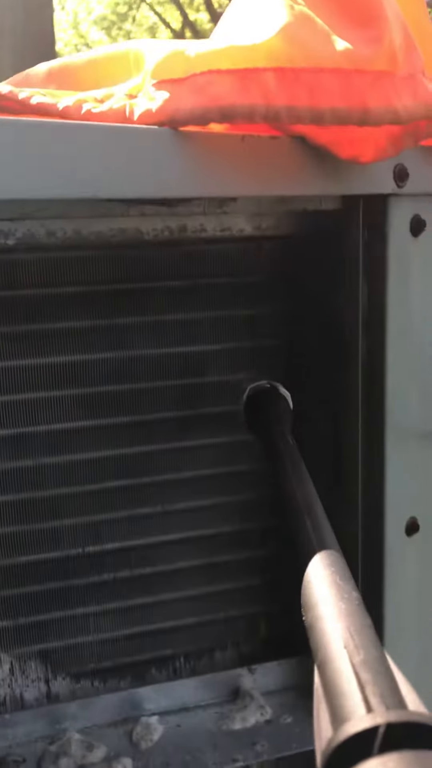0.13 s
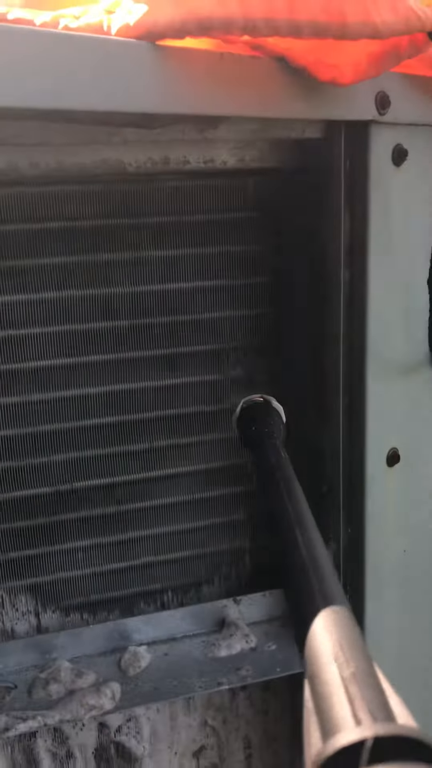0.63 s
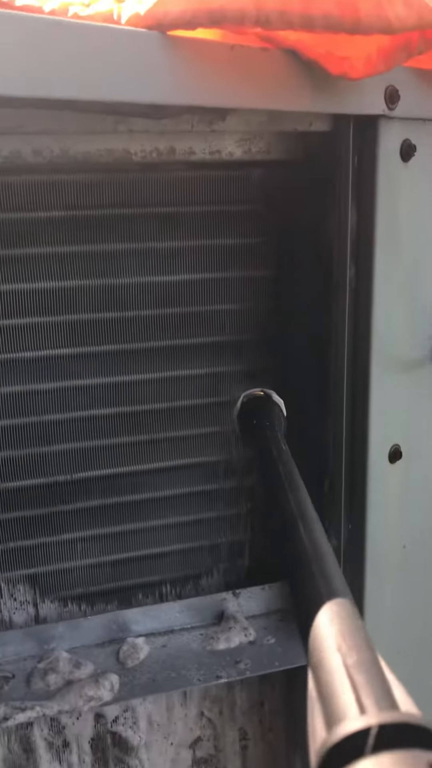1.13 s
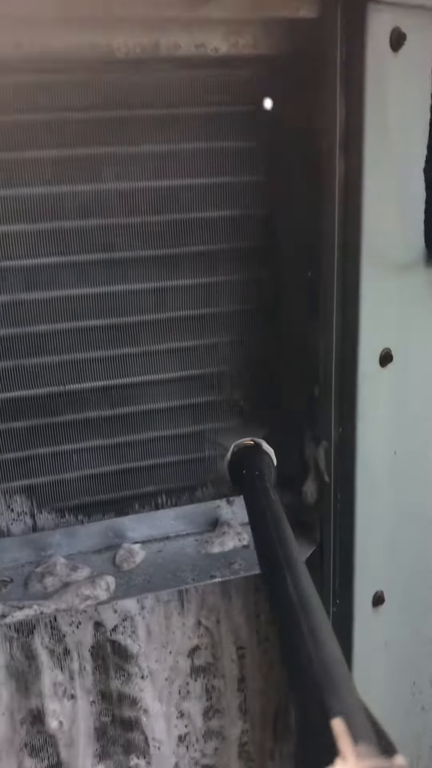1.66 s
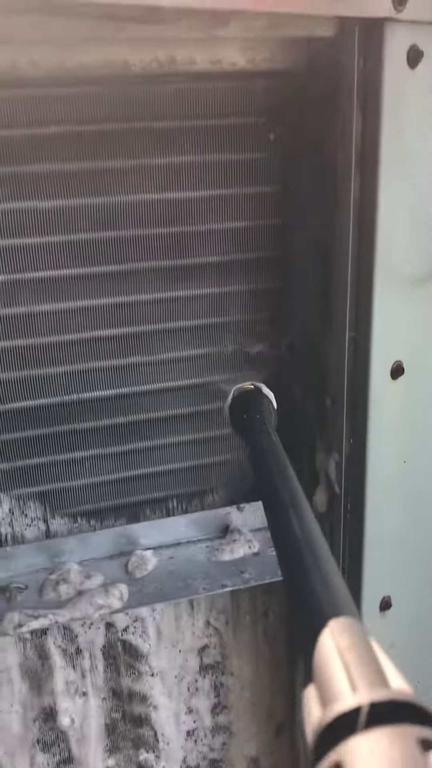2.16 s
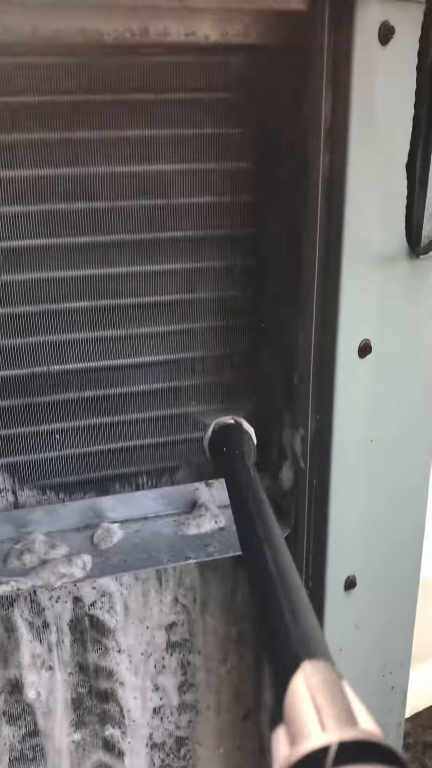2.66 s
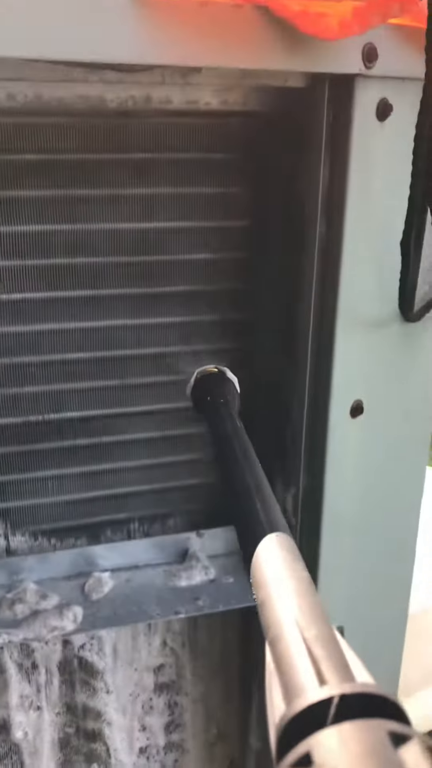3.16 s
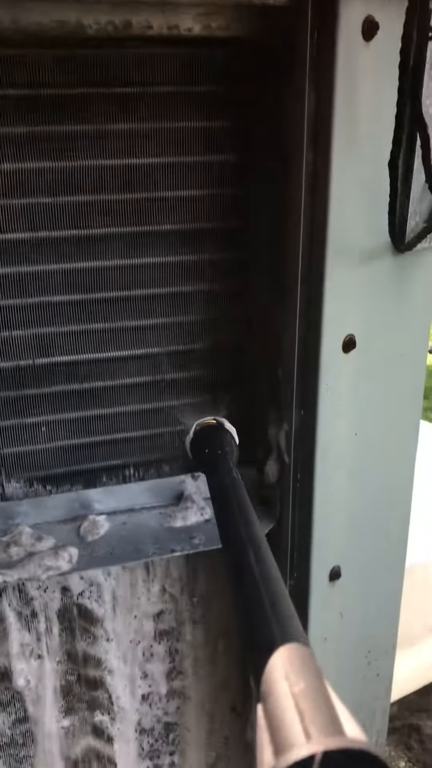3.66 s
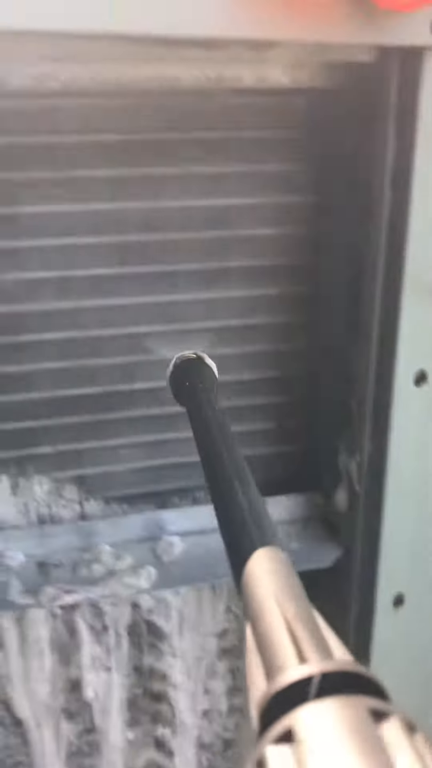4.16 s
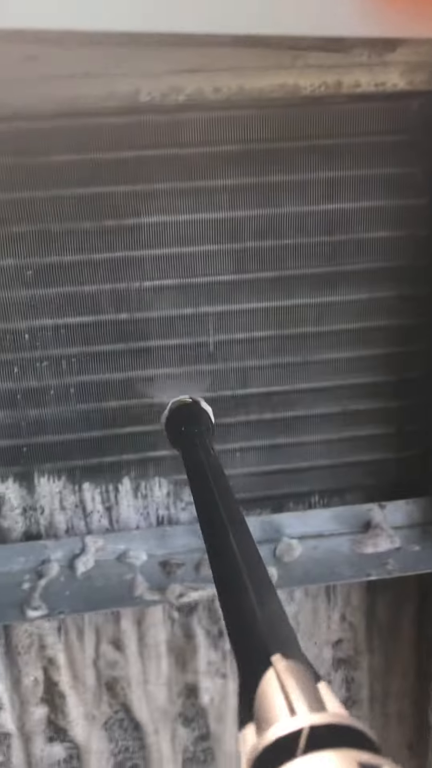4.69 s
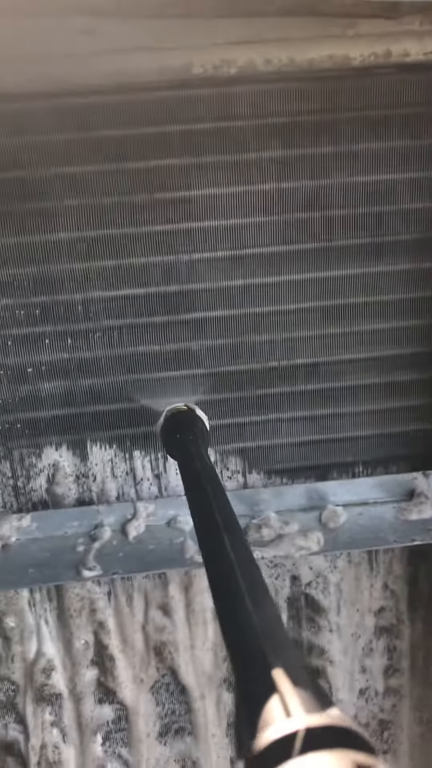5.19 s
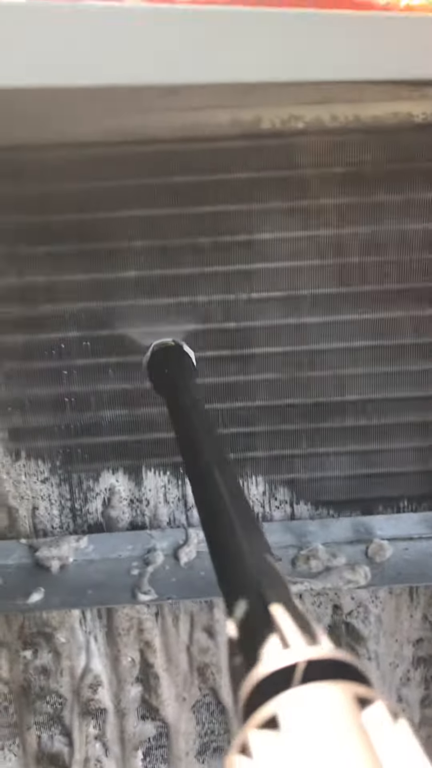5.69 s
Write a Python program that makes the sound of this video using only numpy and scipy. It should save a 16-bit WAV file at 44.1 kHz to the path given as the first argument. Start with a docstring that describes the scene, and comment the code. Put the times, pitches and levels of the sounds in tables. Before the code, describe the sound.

Close, bright water spray sweeps over a finned cooling coil in quick bursts above a buzzing motor and pump, later smoothing into steadier hiss.

```python
"""A small electric pressure washer sprays a finned coil at arm's length from a single microphone.
From the start a motor (sines at shaft multiples) whines through a gear pair into a three-piston pump
(sines at pump multiples); its jet (filtered drop noise) hisses, flares across tubes and rings fin gaps.
Big drops (decaying noise bursts) smack now and then over rumble (noise) and a faint hum (sines) that
sinks; past the last flares a low drone (sines) comes and goes and a thin whistle swells and fades."""
import sys
import numpy as np
from scipy import signal
from scipy.fft import rfft, irfft, next_fast_len
from scipy.io import wavfile
from scipy.ndimage import uniform_filter1d, map_coordinates

SR = 44100
rng = np.random.default_rng(int(sys.argv[2]) if len(sys.argv) > 2 else 0)


def makeup_ratio(level_db):
    """Linear amplitude ratio for a level in decibels (20 dB per factor of ten)."""
    decades = np.asarray(level_db, float) / 20
    return 10 ** decades


def dump(signal):
    """Clip the signal to [-1, 1] and save it as 16-bit WAV at the path in sys.argv[1]."""
    limited = np.clip(np.atleast_2d(signal).T, -1, 1)
    pcm = np.round(limited * 32767).astype(np.int16)
    wavfile.write(sys.argv[1], SR, pcm)


N = 256662
TIME_S = np.arange(N) / SR

SHAFT_HZ = 155.8
PUMP_HZ = SHAFT_HZ * 11 / 50  # pinion teeth over wheel teeth

# Spectrum of the spray. Each row: frequency in Hz, relative density in dB per Hz.
SPRAY_SPECTRUM = [(1500, -43), (3000, -8), (4200, 0.5), (6000, 0.5), (7500, -0.5), (8700, 2), (10000, 0.1),
                  (10500, -2), (11500, -1.5), (14000, -2.5), (15800, -5.5)]
# Machine levels. Each row: time in s, fourth shaft order in dB, housing roar in dB,
# twentieth pump order in dB, thin whistle in dB.
MACHINE_LEVELS = [(0, -38, -32, -50, -56), (1.3, -38, -33, -53, -54), (1.6, -35.5, -30, -50, -53),
                  (2.7, -36, -32, -46, -56), (4.4, -37.5, -33, -44.5, -54.5), (4.7, -38, -33, -45, -46.5),
                  (5.4, -39.5, -34.5, -46.5, -43), (5.82, -41, -33, -48, -60)]


def unit(x):
    """Scaled to rms 1."""
    return x / np.sqrt(np.mean(x ** 2) + 1e-20)


def along(points, hz):
    """(Hz, value) points interpolated on a log frequency axis."""
    point_hz, value = np.transpose(points)
    return np.interp(np.log(hz + 1), np.log(point_hz + 1), value)


def curves(rows):
    """One value per sample for each column after the time."""
    s, *columns = np.transpose(rows)
    return [np.interp(TIME_S, s, column) for column in columns]


def wobble(knots_per_s):
    """Smooth random curve through normally distributed knots."""
    knots = rng.standard_normal(int(N * knots_per_s / SR) + 4)
    return map_coordinates(knots, [TIME_S * knots_per_s])


def hump(t, middle_s, length_s, square):
    """Rises, holds and falls around its middle, height 1; higher square = flatter top, steeper sides."""
    return np.exp(-np.abs(2 * (t - middle_s) / length_s) ** square)


def coloured(x, spectrum):
    """x through a spectrum, rms 1."""
    m = next_fast_len(N + 8192)
    gain = makeup_ratio(along(spectrum, np.fft.rfftfreq(m, 1 / SR)))
    return unit(irfft(rfft(x, m) * gain, m)[:N])


def band(centre_hz, width_hz):
    """Noise in one resonance, rms 1."""
    peak = [(centre_hz - width_hz, -30), (centre_hz, 0), (centre_hz + width_hz, -30)]
    return coloured(rng.standard_normal(N), peak)


def orders(hz, table, waver_db, slip_rad):
    """Sines at multiples of a turning speed, each wavering in level and phase."""
    turns = np.cumsum(hz) / SR
    out = np.zeros(N)
    for multiple, db in table:
        phase = 2 * np.pi * (multiple * turns + rng.random()) + slip_rad * wobble(12)
        level_db = db + waver_db * (wobble(2.99) + wobble(25))
        out += makeup_ratio(level_db) * np.sqrt(2) * np.sin(phase)
    return out


def droplets(grains_per_s, spread_db):
    """Drop impacts: noise whose strength varies smoothly at random from grain to grain."""
    return unit(makeup_ratio(spread_db * wobble(grains_per_s)) * rng.standard_normal(N))


def jet_level_db():
    """Steady hiss plus a flare each time the jet crosses a tube."""
    # Hiss between flares. Each row: time in s, level in dB.
    steady = [(0.0, -28.5), (1.3, -28), (1.45, -25.5), (2.0, -26), (2.15, -29.5), (2.55, -28.5),
              (2.65, -23.5), (3.35, -29), (3.8, -25.5), (4.22, -29.5), (4.3, -25.5), (4.56, -28),
              (4.85, -29.5), (4.97, -26.5), (5.22, -27.5), (5.3, -30), (5.82, -28.5)]
    # Tube crossings. Each row: middle in s, length in s, lift in dB.
    flares = [(0, 0.045, 4.5), (0.082, 0.068, 6.5), (0.207, 0.078, 6.5), (0.354, 0.13, 11),
              (0.521, 0.11, 9.5), (0.657, 0.14, 8), (0.783, 0.097, 7.5), (0.948, 0.13, 8),
              (1.076, 0.079, 9), (1.18, 0.077, 8), (1.308, 0.08, 6), (1.75, 0.046, 2.5), (2.1, 0.051, 6.5),
              (2.211, 0.093, 6.5), (2.315, 0.05, 6), (2.384, 0.054, 7.5), (2.458, 0.073, 7.5),
              (2.804, 0.043, 4.5), (2.879, 0.058, 4.5), (3.108, 0.11, 4.5), (3.276, 0.109, 8),
              (3.414, 0.077, 7.5), (3.514, 0.073, 6.5), (3.635, 0.087, 5), (3.91, 0.041, 4),
              (3.995, 0.054, 5), (4.073, 0.06, 3.8)]
    lift_db = sum(db * hump(TIME_S, s, length_s, 4.1) for s, length_s, db in flares)
    return curves(steady)[0] + lift_db


def fin_gap_ringing_db(hz, t):
    """Lift over frequency and time where the jet rings the fin gaps, each ring climbing in pitch."""
    # Rings. Each row: middle in s, length in s, mid pitch in Hz, nominal lift in dB.
    rings = [(0.076, 0.06, 10300, 8), (0.098, 0.064, 4910, 9.5), (0.31, 0.035, 8700, 8),
             (0.225, 0.04, 4300, 8), (0.347, 0.054, 4570, 12), (0.348, 0.032, 9550, 8),
             (0.392, 0.083, 15000, 15), (0.534, 0.12, 5870, 15.5), (0.662, 0.068, 5840, 14),
             (0.93, 0.09, 5770, 14), (0.991, 0.016, 5400, 15), (1.058, 0.03, 15500, 11),
             (1.072, 0.05, 8500, 9), (1.085, 0.05, 5100, 11), (1.1, 0.097, 11100, 12),
             (1.185, 0.035, 7300, 9), (1.186, 0.043, 5830, 16), (1.33, 0.022, 8700, 9),
             (1.734, 0.03, 8000, 10), (1.807, 0.06, 7240, 13), (2.003, 0.1, 6300, 11),
             (2.104, 0.046, 7100, 15), (2.2, 0.055, 4500, 7), (2.19, 0.025, 11500, 9),
             (2.24, 0.04, 8800, 9), (2.298, 0.06, 6740, 11), (2.383, 0.016, 9900, 11),
             (2.452, 0.15, 15500, 11), (2.463, 0.052, 5000, 15), (2.8, 0.032, 7350, 12),
             (2.81, 0.04, 4700, 6), (2.832, 0.018, 7900, 14), (2.866, 0.015, 7600, 20),
             (2.885, 0.045, 5150, 5), (2.91, 0.026, 8600, 20), (3.055, 0.12, 4600, 10),
             (3.11, 0.22, 9000, 10), (3.242, 0.05, 8550, 18), (3.286, 0.076, 4920, 11),
             (3.3, 0.056, 8730, 15), (3.414, 0.042, 4930, 12), (3.42, 0.04, 8170, 9),
             (3.493, 0.045, 7000, 9), (3.537, 0.045, 9350, 11), (3.56, 0.32, 14500, 8),
             (3.645, 0.025, 8300, 10), (3.648, 0.085, 5660, 16), (3.77, 0.041, 8400, 8),
             (3.92, 0.05, 4360, 12), (3.91, 0.04, 6600, 11), (4.0, 0.06, 13100, 10),
             (4.015, 0.03, 7200, 15), (4.063, 0.035, 7100, 13), (4.098, 0.024, 7800, 18),
             (4.37, 0.37, 8760, 6.5), (4.4, 0.28, 9840, 6), (5.08, 0.3, 14200, 6), (5.1, 0.32, 8650, 6),
             (5.2, 0.9, 4320, 5)]
    width_hz, width_share = 230, 0.036  # half width, plus share of pitch
    rise_share, sputter_share = 0.035, 0.2  # pitch climb over one length; random share of lift
    lift_db = np.zeros((len(hz), len(t)))
    for s, length_s, pitch_hz, db in rings:
        climbing_hz = pitch_hz * (1 + rise_share * (t - s) / length_s)
        offset = (hz - climbing_hz) / (width_hz + width_share * pitch_hz)
        lift_db += db * np.exp(-offset ** 2) * hump(t, s, length_s, 2.7)
    return lift_db * (1 + sputter_share * np.interp(t, TIME_S, wobble(60)))


def jet():
    """Drop noise, lifted where fin gaps ring and throbbing at the three-piston rate."""
    # Sweep over the fins. Each row: time in s, treble tilt in dB (reached at 16 kHz),
    # random ringing in dB rms before flare scaling.
    sweep = [(0, 1, 2.5), (.5, 4.5, 2), (2, 1, 2.5), (3.1, 2.5, 2), (4.3, 3, 2.1), (4.8, 1.5, 0.5),
             (5.82, -1, 2)]
    drops = coloured(droplets(700, spread_db=1.0), SPRAY_SPECTRUM)
    hz, t, z = signal.stft(drops, SR, nperseg=256)
    hz = hz[:, None]
    bright_db, patchy_db = (np.interp(t, TIME_S, curve) for curve in curves(sweep))
    hiss_db = jet_level_db()
    flare_db = hiss_db - uniform_filter1d(hiss_db, size=SR // 3)
    flare_db = np.interp(t, TIME_S, flare_db)

    # a flare is brighter and rings more
    lift_db = fin_gap_ringing_db(hz, t)
    lift_db += (bright_db + 0.31 * flare_db) * (hz - 8000) / 8000
    # many smaller gaps ring at random
    patches = uniform_filter1d(rng.standard_normal(z.shape), size=3, axis=0)
    patches = uniform_filter1d(patches, size=8, axis=1)
    lift_db += patchy_db * makeup_ratio(0.35 * flare_db) * unit(patches)

    # ringing shares the jet's power
    weight = makeup_ratio(2 * along(SPRAY_SPECTRUM, hz))
    share = np.sqrt((weight * makeup_ratio(2 * lift_db)).sum(0) / weight.sum())
    spray = unit(signal.istft(z * makeup_ratio(lift_db) / share, SR, nperseg=256)[1][:N])
    throb = 1 + 0.07 * np.sin(2 * np.pi * 3 * PUMP_HZ * TIME_S)
    return makeup_ratio(hiss_db + 1.0 * wobble(40)) * throb * spray


def hiss_bands():
    """Two noise resonances that swell and sink."""
    # Each row: time in s, 2.4 kHz band in dB, 3.5 kHz band in dB.
    swells = [(0, -37, -63), (1.3, -38.5, -47), (1.7, -56, -36.5), (2.6, -45, -41), (3.2, -43, -42),
              (4.5, -48, -38), (4.8, -37.5, -39.5), (5.3, -36, -41.5), (5.6, -38.5, -38.5),
              (5.82, -40, -44)]
    low_db, high_db = curves(swells)
    return makeup_ratio(low_db) * band(2430, 1300) + makeup_ratio(high_db) * band(3570, 2000)


def motor_whine():
    """Sines at multiples of the shaft speed."""
    # Each row: multiple of shaft speed, level in dB.
    shaft_orders = [(1, -51.5), (5, -53.5), (7, -52.5), (8, -43), (11, -48.5), (12, -37), (22, -46),
                    (44, -53.5)]
    fourth_db, _, _, whistle_db = curves(MACHINE_LEVELS)
    shaft_hz = np.full(N, SHAFT_HZ)
    whine = orders(shaft_hz, shaft_orders, waver_db=0.6, slip_rad=0.22)
    whine += makeup_ratio(fourth_db) * orders(shaft_hz, [(4, 0)], waver_db=0.0, slip_rad=0.26)
    # swells with the whistle
    whine += makeup_ratio(whistle_db) * orders(shaft_hz, [(16, 1)], waver_db=2.0, slip_rad=0.71)
    return whine


def pump_lines():
    """Sines at multiples of the geared-down pump speed, the highest a thin whistle."""
    # Each row: multiple of pump speed, level in dB.
    pump_orders = [(2, -58), (3, -52.5), (6, -54), (15, -62), (16, -57.5), (17, -53.5), (18, -57.5),
                   (19, -50.5), (21, -51), (22, -54), (24, -62.5), (28, -55), (32, -68), (34, -56.5),
                   (35, -53), (37, -62), (39, -58.5), (42, -54), (49, -55), (51, -50)]
    _, _, twentieth_db, whistle_db = curves(MACHINE_LEVELS)
    pump_hz = np.full(N, PUMP_HZ)
    lines = orders(pump_hz, pump_orders, waver_db=0.9, slip_rad=0.25)
    lines += makeup_ratio(twentieth_db) * orders(pump_hz, [(20, 0)], waver_db=0.8, slip_rad=0.4)
    whistle = orders(pump_hz, [(150, 0), (151, 0)], waver_db=1.2, slip_rad=0.5)
    return lines + makeup_ratio(whistle_db) * whistle


def housing_roar():
    """Broad noise of the housing, beating once per shaft turn."""
    # Each row: frequency in Hz, relative density in dB per Hz.
    roar_spectrum = [(350, -25), (480, -10.5), (650, -7), (860, -4.5), (1100, -2), (1500, -2), (2000, -5),
                     (2400, -3), (3000, -5), (3600, -5), (5000, -9.5), (9000, -12.5), (16000, -17)]
    roar_db = curves(MACHINE_LEVELS)[1]
    beat = 1 + 0.07 * np.sin(2 * np.pi * SHAFT_HZ * TIME_S)
    noise = coloured(rng.standard_normal(N), roar_spectrum)
    return makeup_ratio(roar_db + 0.6 * wobble(6)) * beat * noise


def splats():
    """Big drops smack the fins: short broad noise bursts, sharp start, exponential decay."""
    # Each row: start in s, nominal peak in dB.
    smacks = [(0.3724, -11), (0.4864, -13), (0.532, -16), (1.3319, -9), (1.975, -8), (2.0916, -10),
              (2.1854, -9), (2.3794, -9), (2.4744, -15), (2.744, -7.5), (2.866, -6), (3.237, -10),
              (3.9047, -10)]
    t60_s, crest_db = 0.02, 9  # crest: peak of a burst over its rms
    shape, t = np.zeros(N + SR), np.arange(SR // 10) / SR
    for s, db in smacks:
        start = round(s * SR)
        shape[start:start + len(t)] += makeup_ratio(db - crest_db - 60 * t / t60_s)
    return shape[:N] * coloured(rng.standard_normal(N), SPRAY_SPECTRUM)


def drone():
    """Low harmonic tone that comes and goes."""
    # Swells. Each row: middle in s, length in s, level in dB before the orders.
    swells = [(4.05, .2, -47), (4.44, 0.57, -34.5), (5.09, 0.42, -35), (5.43, .26, -41),
              (5.69, 0.28, -32.5)]
    # Each row: multiple of the fundamental, relative level in dB.
    drone_orders = [(1, -0.5), (3, -14), (4, -17.5)]
    strength = sum(makeup_ratio(db) * hump(TIME_S, s, length_s, 3.5) for s, length_s, db in swells)
    return strength * orders(np.full(N, 78.7), drone_orders, waver_db=0.3, slip_rad=0.15)


def hum():
    """Faint sinking fundamental with its octave."""
    # Each row: time in s, fundamental in Hz, its level in dB.
    glide = [(.6, 67, -47), (1.6, 61.95, -46.5), (4.6, 58.55, -52), (4.9, 56.5, -63)]
    hum_hz, hum_db = curves(glide)
    return makeup_ratio(hum_db) * orders(hum_hz, [(1, 0.0), (2, -8)], waver_db=2.0, slip_rad=0.67)


def rumble():
    """Distant low noise, wavering slowly in level."""
    # Each row: frequency in Hz, relative density in dB per Hz.
    rumble_spectrum = [(15, -53), (25, -29), (40, -8.5), (59, -1), (86, -4), (141, -5), (162, -9),
                       (179, -9), (200, -6), (414, -14), (480, -25), (620, -31), (1060, -120)]
    return makeup_ratio(-41.0 + wobble(2.04)) * coloured(rng.standard_normal(N), rumble_spectrum)


def scene():
    """One microphone feeds both channels."""
    washer = jet() + hiss_bands() + motor_whine() + pump_lines() + housing_roar()
    mix = washer + splats() + drone() + hum() + rumble()
    return np.tile(mix, (2, 1))


def low_pass(x):
    """Removes everything above the highest recorded frequency."""
    return signal.sosfilt(signal.butter(12, 17000, fs=SR, output="sos"), x)


def record(dry):
    """Keeps nothing above the band limit."""
    top_hz = 15750
    m = next_fast_len(N + 8192)
    passed = np.fft.rfftfreq(m, 1 / SR) < top_hz
    kept = irfft(rfft(dry, m) * passed, m)[:, :N]
    return low_pass(kept)


dry = scene()
out = record(dry)
dump(out)
```